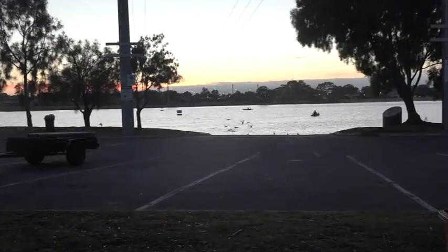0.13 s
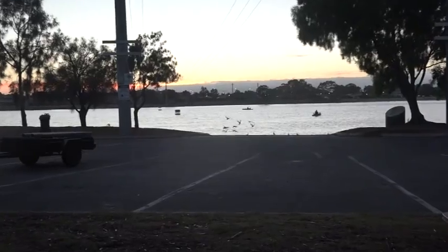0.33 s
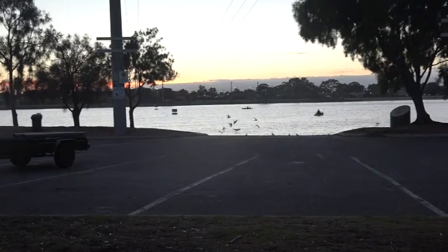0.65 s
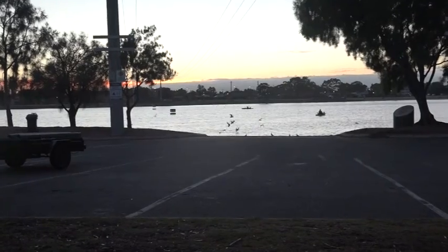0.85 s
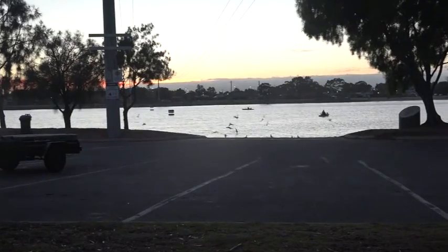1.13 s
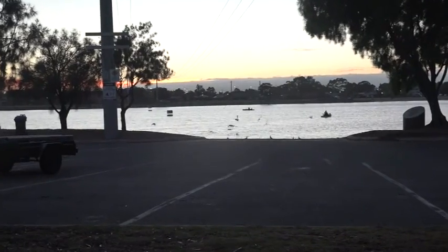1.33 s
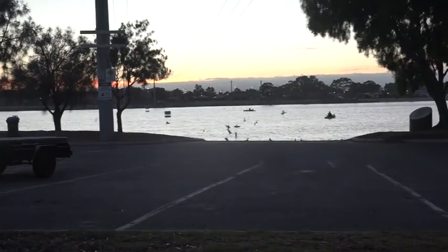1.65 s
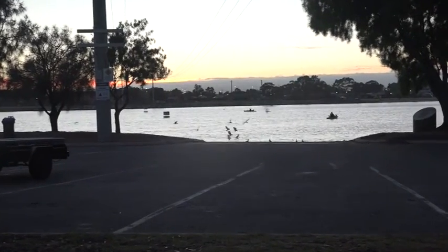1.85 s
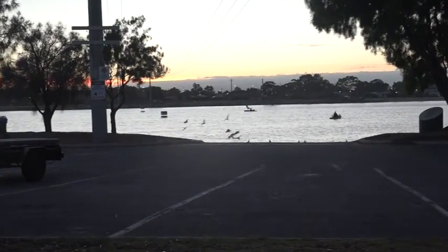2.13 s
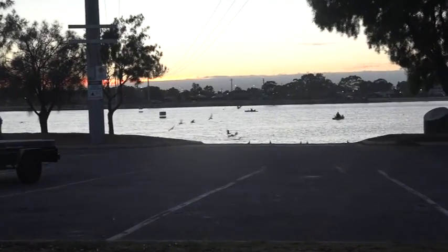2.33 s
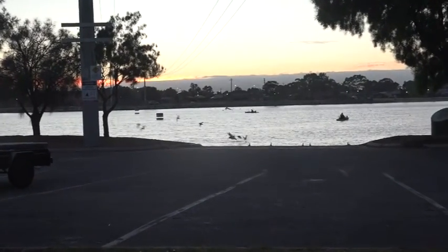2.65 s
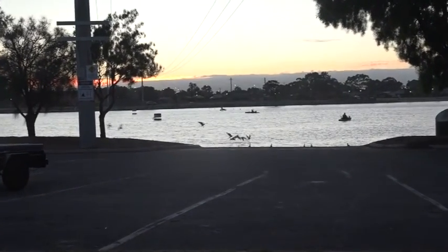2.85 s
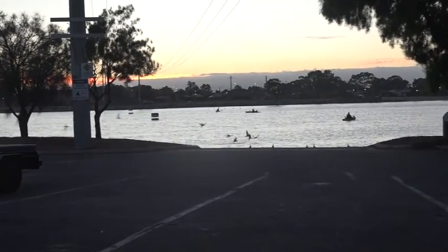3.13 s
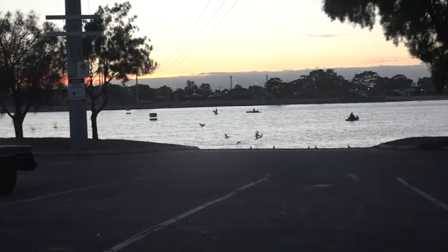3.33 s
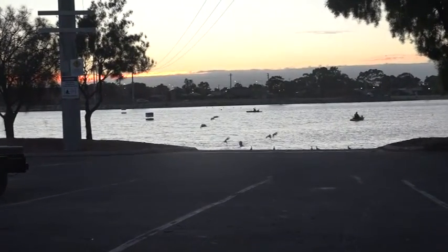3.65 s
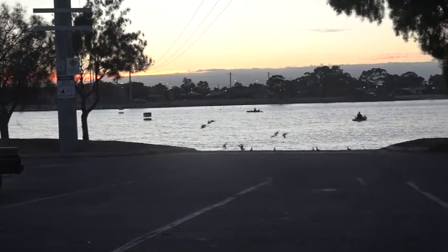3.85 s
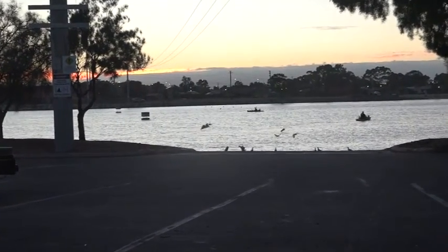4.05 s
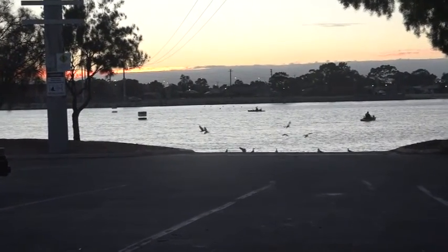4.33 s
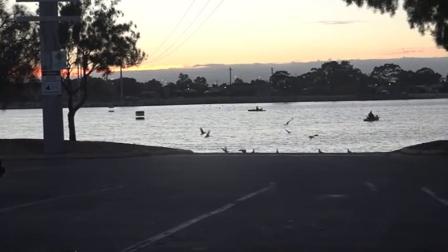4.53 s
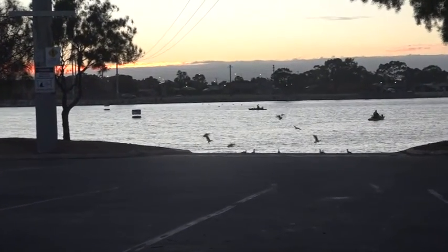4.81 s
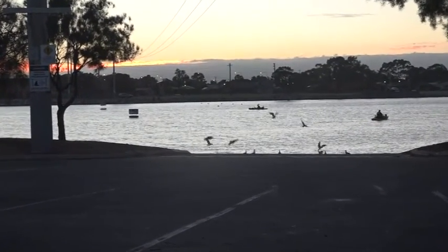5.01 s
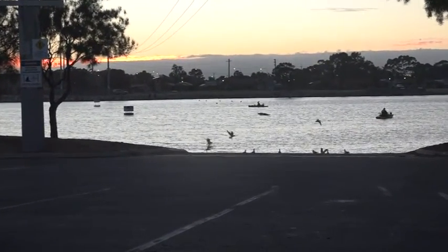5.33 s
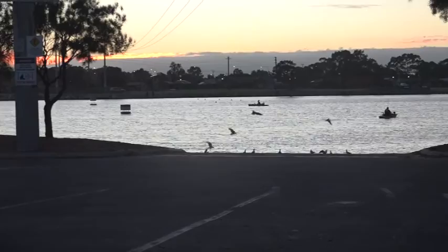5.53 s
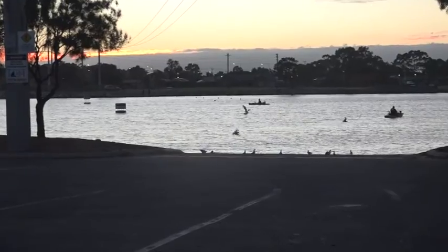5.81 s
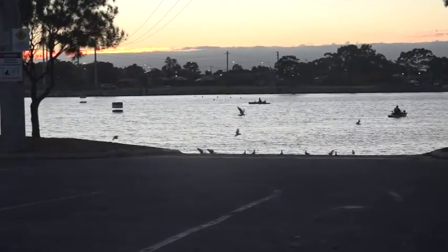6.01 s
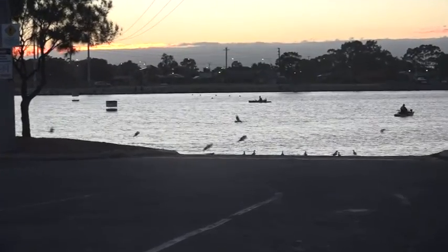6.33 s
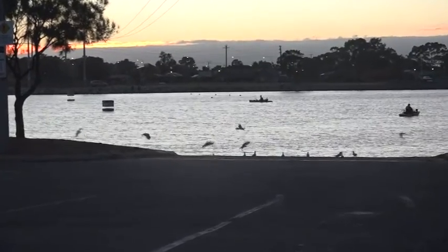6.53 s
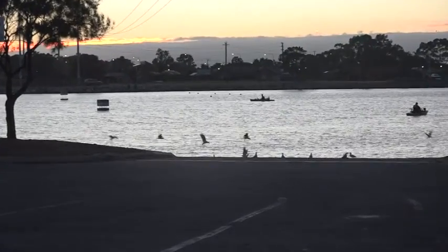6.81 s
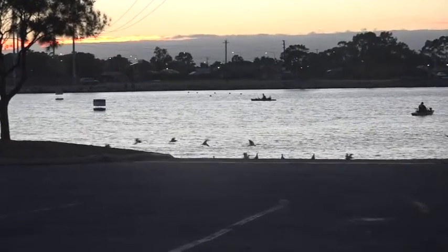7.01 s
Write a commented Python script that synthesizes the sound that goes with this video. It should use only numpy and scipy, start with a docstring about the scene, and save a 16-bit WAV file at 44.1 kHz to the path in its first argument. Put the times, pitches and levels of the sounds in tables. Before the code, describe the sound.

Gulls squabble over a lakeside at dusk, yapping, croaking and rasping, swelling into close screeches that break into piercing whistles over wind-buffeted low rumble.

```python
"""Open air with a squabbling flock of parrots: yaps, croaks and one shrill buzz, thin wails and whistles far and
near, long mews, a rasping flock that grows louder, and close screeches and yodels, some breaking upward into
a whistle. The calls are shaky stacks of partials, near sines or pulsed resonances, with smeared echoes. Wind
noise and knocks buffet the microphone over far town rumble, made of noise and decaying sines. Only the left
input is wired; the right one holds hiss and a faint leak, and both sink when the left is loud."""
import sys
import numpy as np
from scipy import signal
from scipy.fft import rfft, irfft, next_fast_len
from scipy.io import wavfile
from scipy.ndimage import uniform_filter1d

SR = 44100
rng = np.random.default_rng(int(sys.argv[2]) if len(sys.argv) > 2 else 0)


def how_loud(loudness_db):
    """Turn decibels into a plain amplitude multiplier (0 dB gives 1, 20 dB gives 10)."""
    steps = np.asarray(loudness_db, float) / 20
    return 10 ** steps


def master(y):
    """Save y as 16-bit WAV."""
    cut = np.clip(np.atleast_2d(y).T, -1, 1)
    pcm = np.round(cut * 32767)  # scale
    wavfile.write(sys.argv[1], SR, pcm.astype(np.int16))


N = 316197
T = np.arange(N) / SR
# Source levels are those of the mean of both channels; scene() turns them into left-channel levels.


def rms_one(x):
    """Scale to rms 1."""
    return x / np.sqrt(np.mean(x ** 2) + 1e-20)


def in_time(rows):
    """The stretch a table spans, and its columns drawn as lines sample by sample."""
    s, *columns = np.transpose(rows)
    first, last = round(s[0] * SR), min(round(s[-1] * SR), N)
    return slice(first, last), [np.interp(T[first:last], s, column) for column in columns]


def at_hz(points, hz):
    """Read a spectrum on a log-frequency axis."""
    point_hz, point_db = np.transpose(points)
    return np.interp(np.log(np.maximum(hz, 1)), np.log(point_hz), point_db)


def coloured(x, points):
    """Filter a sound with the spectrum of a table."""
    size = next_fast_len(N)
    gain = how_loud(at_hz(points, np.fft.rfftfreq(size, 1 / SR)))
    return irfft(rfft(x, size) * gain, size)[:N]


def drift(rate_hz, size=N):
    """Random wander of rms 1: noise twice through a one-pole low-pass."""
    r = np.exp(-2 * np.pi * rate_hz / SR)
    settle = 8000
    noise = rng.standard_normal(size + settle)
    return rms_one(signal.lfilter([1], [1, -2 * r, r * r], noise)[settle:])


def fade(size, s):
    """Soft ends."""
    from_end = np.minimum(np.arange(size), np.arange(size)[::-1])
    return np.clip(from_end / (s * SR), 0, 1)


def add(out, start, sound):
    """Mix a sound in at its time."""
    at = round(start * SR)
    out[at:at + len(sound)] += sound[:N - at]


def shaky_phase(hz, rough):
    """Membranes that swing unevenly: the pitch lurches every few cycles."""
    return 2 * np.pi * np.cumsum(hz * (1 + rough * drift(219.8, size=len(hz)))) / SR


def rattle(size, per_s):
    """One at each catch of the membranes, dying away until the next; the catches come unevenly."""
    cycle = np.cumsum(per_s * how_loud(2.5 * drift(25, size=size))) / SR % 1
    return np.exp(-4 * cycle)


# Strength of the wind. Each row: time in seconds, level in dB.
WIND_LEVEL = [(0.0, -49), (0.99, -45), (1.35, -49.5), (1.84, -44.5), (2.61, -57), (2.92, -50.5),
              (3.25, -63), (3.39, -42.5), (3.85, -63.5), (4.08, -43.5), (4.39, -55), (4.66, -49),
              (5.71, -53), (6.38, -45), (7.02, -45), (7.17, -56)]
# Colour of the wind noise. Each row: frequency in Hz, relative level in dB per Hz.
GUST_COLOUR = [(12, -47), (20, -0.5), (63, 2), (544, -20.5), (700, -24), (910, -24.5), (1540, -120)]


def wind():
    """Wind on the microphone: low noise whose level is lumpy."""
    out = np.zeros(N)
    span, (level_db,) = in_time(WIND_LEVEL)
    lumpy = rng.standard_normal(N) * how_loud(4.9 * drift(18.2))
    out[span] = rms_one(coloured(lumpy, GUST_COLOUR))[span] * how_loud(level_db)
    return out


# Colour of the far rumble. Each row: frequency in Hz, relative level in dB per Hz.
RUMBLE_COLOUR = [(120, -16), (200, -7.5), (543, -11.5), (920, -3), (1370, -4.5), (3160, -8.5),
                 (5550, -15.5), (8740, -30), (11700, -31.5), (15400, -36.5)]


def town_rumble():
    """Far town: steady coloured noise whose level wavers slowly."""
    noise = rms_one(coloured(rng.standard_normal(N), RUMBLE_COLOUR))
    return how_loud(-54 + 1.1 * drift(2.7)) * noise


# Squawks out of the flock. Each row: start in seconds, held time in seconds, rasp level in dB before the cap
# in flock(), shrill piping level in dB.
SQUAWKS = [(.21, 0.023, -58.5, -75), (.72, 0.19, -57, -55), (1.38, 0.071, -51.5, -51.5),
           (2.13, 0.1, -50, -51.5), (2.355, 0.12, -46.5, -42), (2.63, 0.056, -46, -44),
           (2.69, 0.036, -62, -40.5), (2.839, 0.064, -47.5, -46.5), (3.09, 0.074, -60, -46.5),
           (3.3, 0.16, -52, -67), (3.5, 0.088, -49.5, -46.5), (3.578, 0.11, -42.5, -45),
           (3.83, 0.091, -43.5, -44.5), (4.24, 0.16, -39.5, -38.5), (4.598, 0.33, -45, -43.5),
           (4.819, 0.088, -32, -38), (5.148, 0.22, -38.5, -42), (5.239, 0.11, -42, -31.5),
           (5.7, 0.057, -47.5, -52), (5.84, 0.12, -37, -30), (6.0, 0.18, -43.5, -49.5),
           (6.431, 0.19, -42.5, -48), (6.64, 0.15, -35, -37), (7.04, 0.13, -35.5, -57)]


def squawk_power(level_db):
    """Power of all squawks: quick attack, a swelling hold, then a steady fall in dB."""
    attack_s, swell_db, release_db_per_s = 0.029, 4.5, 162
    out = np.zeros(N)
    for (start, held, *_), top_db in zip(SQUAWKS, level_db):
        t = np.arange(round((held + .5) * SR)) / SR
        swell = swell_db * (np.minimum(t / held, 1) - 1)
        release = release_db_per_s * np.maximum(t - held, 0)
        attack = np.minimum(t / attack_s, 1)
        add(out, start, (how_loud(top_db + swell - release) * attack) ** 2)
    return out


# The flock between squawks. Each row: time in seconds, rasp level in dB before the cap, piping level in dB.
MURMUR = [(0, -71, -73.5), (2.8, -52.5, -53), (7.17, -51, -55.5)]
# Colours of the flock's three layers. Each row: frequency in Hz, filter gain in dB.
RASP_COLOUR = [(1050, 2.5), (1600, -5.5), (4500, 18), (5200, 5.5), (6500, 9.5)]
PIPING_COLOUR = [(4300, -28), (5000, 1), (5350, 7), (5700, -1.5), (6300, -22)]
TREBLE_COLOUR = [(3410, -95), (5800, -4), (6220, -14), (7470, -7.5), (9340, -20.5), (11900, -17),
                 (15400, -35)]


def flock():
    """Three birds rasp on lurching pitches, throat resonance and treble rising with level; two pipe hoarsely."""
    span, murmur_db = in_time(MURMUR)
    squawk_db = np.transpose(SQUAWKS)[2:]
    rasp_db, piping_db = [10 * np.log10(how_loud(low_db) ** 2 + squawk_power(top_db)[span])
                          for low_db, top_db in zip(murmur_db, squawk_db)]
    treble_db = 1.01 * (rasp_db + 42.0) - 52.5
    rasp_db = np.minimum(rasp_db, -40)  # the rasp stops growing here, so close screeches stand out
    throat_hz = 4100 + 110 * (np.maximum(rasp_db, -52) + 36) + 250 * drift(5)

    rasp = treble = piping = 0
    for pitch_hz in (950, 1180, 1350):
        hz = pitch_hz * (1 + .07 * drift(6)) * (1 - .25 * rattle(N, 45))
        phase = shaky_phase(hz, rough=.05)
        flutter = how_loud(3 * drift(110) + 3 * drift(25))
        for k in range(1, 6):
            resonance = .4 + np.exp(-((k * hz - throat_hz) / 900) ** 2)
            rasp = rasp + flutter * np.sin(k * phase) * resonance
        treble = treble + flutter * sum(np.sin(k * phase) for k in range(5, 15))
    for pitch_hz in (5250, 5500):
        phase = shaky_phase(pitch_hz * (1 + .02 * drift(13)), rough=0.039)
        piping = piping + np.sin(phase) * how_loud(3.7 * drift(11.0))

    out = np.zeros(N)
    for sound, colour, level_db in ((rasp, RASP_COLOUR, rasp_db), (piping, PIPING_COLOUR, piping_db),
                                    (treble, TREBLE_COLOUR, treble_db)):
        out[span] += rms_one(coloured(sound, colour)[span]) * how_loud(level_db)
    return out


# Short yaps. Each row: start in seconds, nominal peak in dB, strongest partial from Hz, to Hz,
# lower partial in dB relative to the strongest.
YAPS = [(0.004, -41.5, 3000, 3450, -16), (0.079, -35, 2970, 3330, -18), (0.15, -44.5, 3260, 3060, 0),
        (0.2177, -45.5, 3100, 2780, -12), (0.529, -44.5, 2810, 2890, -4), (0.651, -42.5, 2815, 2520, -1),
        (0.8036, -43.5, 3020, 2640, -9), (0.885, -42.5, 2860, 2620, 0), (1.2346, -43.5, 3240, 3120, -1.5),
        (1.304, -39, 3180, 2870, -14), (1.382, -36, 2900, 2880, -24), (1.454, -34.5, 2880, 3190, -14),
        (1.885, -36, 3070, 2920, -17), (1.913, -38, 3000, 3300, -22), (1.999, -42, 3180, 3330, -32),
        (2.051, -37.5, 3000, 3130, -6.5), (2.658, -33.5, 3080, 3370, -34), (2.74, -39.5, 3030, 3380, -30),
        (2.804, -44.5, 2950, 2730, -7), (3.427, -44, 2820, 3190, -25), (3.5103, -35, 3260, 3110, -13)]


def yaps():
    """Short gritty barks of three partials that slide together while each flutters in level on its own."""
    length_s, lower, upper = 0.0415, .67, 1.3  # neighbours as multiples of the strongest partial
    drop_in = .09  # each bark drops in from this share above its pitch
    out = np.zeros(N)
    u = np.linspace(0, 1, round(length_s * SR))
    envelope = np.clip(u / .06, 0, 1) * (1 + .1 * u) * np.clip((1 - u) / .35, 0, 1)
    for start, peak_db, from_hz, to_hz, lower_db in YAPS:
        hz = (from_hz + (to_hz - from_hz) * u) * (1 + drop_in * np.exp(-u / .12))
        phase = shaky_phase(hz, rough=.028)
        bark = 0
        for multiple, level_db in ((1, 0), (lower, lower_db), (upper, -18)):
            bark = bark + how_loud(level_db + 3 * drift(70, size=len(u))) * np.sin(multiple * phase)
        add(out, start, how_loud(peak_db - 4) * bark * envelope)
    return out


def whistle(hz, level_db, soft_s, rough):
    """A near sine with a weak octave and a fluttering level."""
    phase = shaky_phase(hz, rough)
    tone = np.sin(phase) + how_loud(-27) * np.sin(2 * phase)
    return np.sqrt(2) * tone * how_loud(level_db + 2.2 * drift(80, size=len(hz))) * fade(len(hz), soft_s)


# Thin wails and whistles, far and near. Each row: start in seconds, length in seconds, from Hz, to Hz,
# starting level in dB.
WAILS = [(0.041, 0.024, 5360, 5300, -54.5), (0.667, 0.024, 2275, 2220, -44.5),
         (0.208, 0.036, 4130, 3680, -52.5), (0.12, 0.033, 4530, 3750, -63), (1.919, 0.085, 4230, 4010, -53),
         (2.596, 0.087, 4280, 4720, -47.5), (2.598, 0.24, 1047, 1144, -59), (3.828, 0.036, 2140, 2430, -51),
         (4.798, 0.038, 4850, 5350, -37), (4.935, 0.05, 5470, 5450, -33.5), (4.921, 0.046, 5020, 5170, -33),
         (4.946, 0.073, 3310, 3110, -46), (5.057, 0.085, 3310, 3190, -48), (6.005, 0.19, 5750, 5620, -41.5),
         (6.741, 0.049, 5350, 5355, -23), (6.785, .1, 5160, 5050, -33.5), (6.972, 0.071, 1804, 1550, -47)]


def wails():
    """Birds wail or whistle on one straight slide, each losing level steadily."""
    fade_db_per_s = 37
    out = np.zeros(N)
    for start, length, from_hz, to_hz, level_db in WAILS:
        size = round(length * SR)
        hz = np.linspace(from_hz, to_hz, size)
        add(out, start, whistle(hz, level_db - fade_db_per_s * T[:size], soft_s=0.0047, rough=.013))
    return out


# Croaks and one shrill buzz. Each row: start in seconds, end in seconds, pulses per second, level in dB,
# resonance height as a multiple.
CROAKS = [(.255, 0.346, 100, -51, .97), (0.501, 0.578, 77, -51, 1.0), (0.871, 0.947, 85, -49, 1.3),
          (1.466, 1.596, 90, -47.5, 1.05), (2.07, 2.268, 80, -49, 1.02), (2.844, 3.336, 55, -49.5, 1.0),
          (4.615, 4.705, 92, -45, 1.02), (5.186, 5.327, 83, -38.5, 3.0)]
# Throat resonances at height 1. Each row: frequency in Hz, width in Hz, gain in dB at the start of a croak.
CROAK_THROAT = [(1800, 280, 0), (2600, 350, -2), (3600, 550, -3)]


def croaks():
    """Pulsed noise rings a sinking throat; the upper resonances fade first and are weak in the shrill buzz."""
    sag_per_s = 0.34  # the resonances sink by this share per second
    out = np.zeros(N)
    for start, end, per_s, level_db, height in CROAKS:
        size = round((end - start) * SR)
        t = np.arange(size) / SR
        cycle = np.cumsum(per_s * (1 + 0.27 * drift(36, size=size))) / SR % 1
        pulses = (.4 + np.exp(-cycle / .25)) * rng.standard_normal((2, size))
        sound = 0
        for hz, width_hz, gain_db in CROAK_THROAT:
            r = np.exp(-np.pi * width_hz * height / SR)
            # two low-passed noises on a cosine and a sine make one moving resonance
            even, odd = signal.lfilter([(1 - r) ** 2], [1, -2 * r, r * r], pulses)
            phase = 2 * np.pi * hz * height * (t - sag_per_s * t ** 2 / 2)
            ringing = even * np.cos(phase) + odd * np.sin(phase)
            sound = sound + how_loud(gain_db * (height ** 2 + 13.0 * t)) * ringing
        add(out, start, rms_one(sound) * how_loud(level_db) * fade(size, .025))
    return out


# Gust knocks. Each row: start in seconds, level before the decay in dB, frequency in Hz.
KNOCKS = [(1.674, -36, 135), (1.868, -24.5, 246), (3.365, -32, 90), (6.338, -25.5, 145),
          (6.468, -28.5, 223), (6.777, -32, 308), (7.025, -31, 132)]


def knocks():
    """Single knocks where an eddy bursts on the microphone port: sines that die within a few cycles."""
    out = np.zeros(N)
    t = np.arange(round(.06 * SR)) / SR
    for start, level_db, hz in KNOCKS:
        decay = np.exp(-t * hz / 0.88)
        add(out, start, how_loud(level_db) * np.sin(2 * np.pi * hz * t) * decay)
    return out


# Throat colour of the close voices. Each row: frequency in Hz, gain of a partial there in dB.
THROAT_COLOUR = [(1300, -11.5), (1900, -13.5), (2600, -2.5), (3800, 2), (4600, 1.5), (5300, 2), (6100, -9),
                 (7700, -2), (9000, -26), (11800, -10.5), (15000, -19), (15500, -60)]


def stack(hz, level_db, rough):
    """A stack of partials under the throat colour; roughness rattles and shakes pitch and level."""
    size = len(hz)
    rough = np.clip(rough, 0, 1)
    catch = rattle(size, 65)
    hz = hz * (1 - .8 * rough * catch)  # the membranes catch, drop in pitch and sweep back up
    phase = shaky_phase(hz, .1 * rough)
    thin_db = 3.9 * np.clip(hz / 1400 - 1, 0, 1) / 0.21  # the higher register has weaker overtones
    tone = 0
    for k in range(1, 13):
        partial_db = at_hz(THROAT_COLOUR, k * hz) - thin_db * max(k - 2, 0)
        own_swell_db = 4 * drift(30, size=size)
        tone = tone + how_loud(partial_db + own_swell_db) * np.sin(k * phase)
    shake_db = rough * (6.4 * drift(120, size=size) + 7 * catch)
    return rms_one(tone) * how_loud(level_db + shake_db) * fade(size, 0.0036)


# Close screeches. Each row: start in seconds, length in seconds, pitch in Hz, level in dB,
# roughness of the hold from 0 to 1.
SCREECHES = [(4.784, 0.16, 1305, -39.5, 0.37), (5.277, 0.12, 1350, -34, 0.28),
             (5.831, 0.12, 1336, -27.5, .25)]


def screeches():
    """Each screech scoops up in pitch and level, fairly clean, then turns rough and holds."""
    scoop_s, scoop_share, scoop_db = 0.0295, 0.17, -14
    out = np.zeros(N)
    for start, length, pitch_hz, level_db, rough in SCREECHES:
        t = np.arange(round(length * SR)) / SR
        scoop = np.clip(1 - t / scoop_s, 0, 1)
        roughening = np.clip(t / scoop_s * 2 - 1.8, .1, 1)
        hz = pitch_hz * (1 - scoop_share * scoop)
        add(out, start, stack(hz, level_db + scoop_db * scoop, rough * roughening))
    return out


# Screeches breaking into a whistle. Each row: start in seconds, rise in seconds, held time in seconds,
# top frequency in Hz, top level in dB.
BREAKS = [(4.901, 0.024, 0.037, 4460, -30.5), (5.369, 0.023, 0.039, 5290, -20.5),
          (5.932, 0.016, 0.057, 5187, -16.5), (7.147, 0.01, 0.05, 5080, -24.5)]


def breaking_whistles():
    """The voice flips up to a throbbing whistle that sags and dies."""
    from_share, rise_db, fall_db, sag_hz_per_s = .56, 13.5, 17, 2065
    throb_hz, throb_db = 40.3, 2.5
    out = np.zeros(N)
    for start, rise, held, top_hz, top_db in BREAKS:
        t = np.arange(round((rise + held) * SR)) / SR - rise
        below = np.maximum(-t / rise, 0)  # 1 at the start, 0 from the top on
        after = np.maximum(t, 0)  # seconds since the top
        hz = top_hz * (1 - (1 - from_share) * below ** 1.5) - sag_hz_per_s * after
        throb = throb_db * (np.cos(2 * np.pi * throb_hz * after) - 1)
        level_db = top_db - rise_db * below - fall_db * (after / held) ** 2.8 + throb
        add(out, start, whistle(hz, level_db, soft_s=0.0043, rough=0.0099))
    return out


# Long mews, one list each. Each row: time in seconds, pitch in Hz, first partial in dB, second partial in dB.
MEWS = [
    [(5.38, 845, -51, -27), (5.43, 926, -52, -78), (5.58, 919, -51.5, -59), (6.07, 890, -52, -43),
     (6.18, 883, -50, -46), (6.21, 754, -82, -44)],
    [(6.445, 892, -46.5, -70), (6.48, 1116, -46, -50.5), (6.92, 1081, -51, -65), (7.11, 998, -51.5, -48.5)],
]


def mews():
    """A bird holds a clear, slightly shaky note of two partials."""
    out = np.zeros(N)
    for rows in MEWS:
        span, (hz, first_db, second_db) = in_time(rows)
        size = len(hz)
        phase = shaky_phase(hz * (1 + .006 * drift(20, size=size)), rough=0.025)
        tone = how_loud(first_db) * np.sin(phase) + how_loud(second_db) * np.sin(2 * phase)
        out[span] += np.sqrt(2) * tone * how_loud(2.6 * drift(35, size=size)) * fade(size, .015)
    return out


# Yodels. Each row: start in seconds, length in seconds, from Hz, to Hz, level in dB.
YODELS = [(6.631, 0.033, 1234, 1540, -39), (6.662, 0.051, 1704, 2310, -31), (6.705, 0.054, 1810, 2256, -30),
          (6.756, 0.07, 1722, 2050, -34.5), (7.044, 0.049, 1130, 1293, -45.5),
          (7.08, .036, 1613, 2250, -33), (7.114, 0.031, 1914, 1526, -31.5),
          (7.144, 0.027, 1495, 2270, -42.5)]


def yodels():
    """The voice slides in its higher register, fairly clear and clearing further."""
    out = np.zeros(N)
    for start, length, from_hz, to_hz, level_db in YODELS:
        u = np.linspace(0, 1, round(length * SR))
        hz = from_hz + (to_hz - from_hz) * u ** 1.8  # the slide quickens towards its end
        add(out, start, stack(hz, level_db, .21 * (1 - .5 * u)))
    return out


# Echoes of the open air. Each row: delay in seconds, level in dB before dulling.
ECHOES = [(.021, -11.5), (0.055, -18.5), (.11, -19)]


def echoes(x):
    """A few echoes, smeared by short noise bursts and dulled by a low-pass."""
    taps, size = np.zeros(SR // 4), round(0.033 * SR)
    for delay, level_db in ECHOES:
        smear = rng.standard_normal(size) * np.hanning(size)
        add(taps, delay, how_loud(level_db) * smear / np.linalg.norm(smear))
    return signal.lfilter([.5], [1, -.5], signal.fftconvolve(x, taps)[:N])


def scene():
    """Calls with echoes, the flock, wind and the far rumble reach one microphone on the left."""
    calls = yaps() + wails() + croaks() + screeches() + breaking_whistles() + mews() + yodels()
    mean = calls + echoes(calls) + flock() + wind() + knocks() + town_rumble()
    left = how_loud(6) * mean  # with the right silent, the left is twice the mean
    return np.array([left, 0 * left])


def band_limit(x):
    """A steep low-pass at the top of the band."""
    return signal.sosfilt(signal.butter(12, 15500, fs=SR, output="sos"), x)


# Leak from left into right. Each row: frequency in Hz, gain in dB before wavering and cuts.
LEAK_COLOUR = [(30, -24), (1000, -29), (8000, -36)]
# Colour of the idle input's hiss. Each row: frequency in Hz, relative level in dB per Hz.
HISS_COLOUR = [(300, 23), (15500, 9)]


def record(dry):
    """The idle right input holds hiss and a late, wavering leak; a suppressor cuts both while the left is loud."""
    left = dry[0]
    level_db = 10 * np.log10(uniform_filter1d(left ** 2, round(0.042 * SR)) + 1e-12)
    held_db = np.maximum.accumulate(level_db + 150 * T) - 150 * T  # falls by 150 dB per second at most
    cut_db = -np.clip(4 * (held_db + 38), 0, 40)
    leak = np.roll(coloured(left, LEAK_COLOUR), 2)  # two samples late
    leak = leak * how_loud(cut_db + 6.5 * drift(21))
    hiss = how_loud(-72.5) * rms_one(coloured(rng.standard_normal(N), HISS_COLOUR))
    right = leak + hiss * how_loud(1.8 * cut_db)
    return band_limit(np.array([left, right]))


dry = scene()
out = record(dry)
master(out)
```